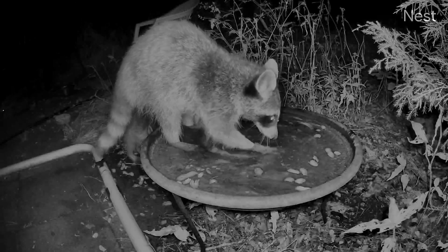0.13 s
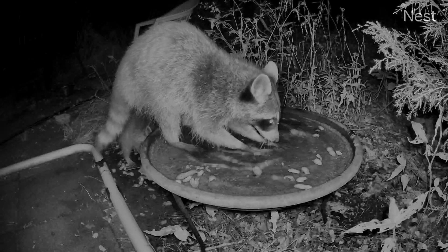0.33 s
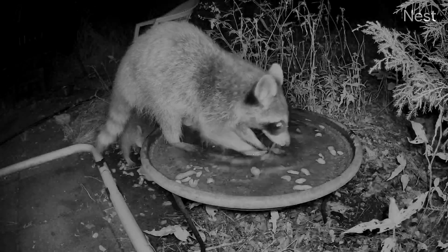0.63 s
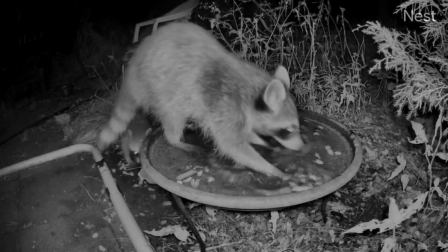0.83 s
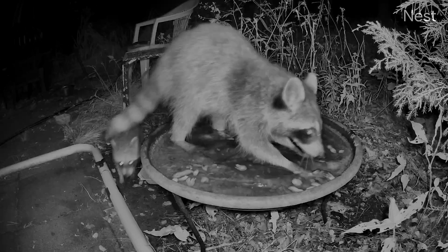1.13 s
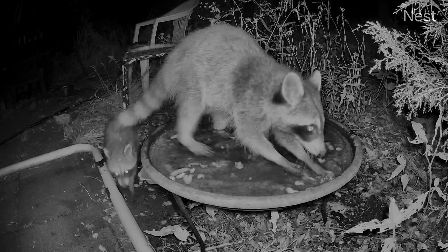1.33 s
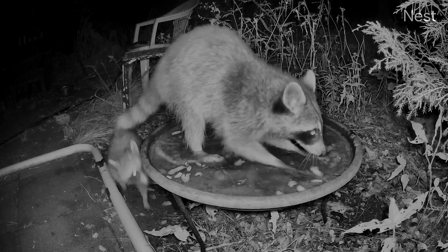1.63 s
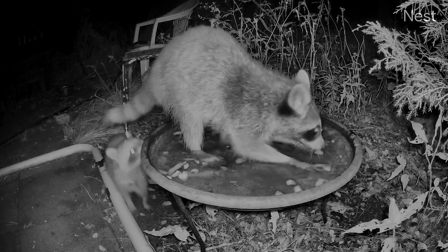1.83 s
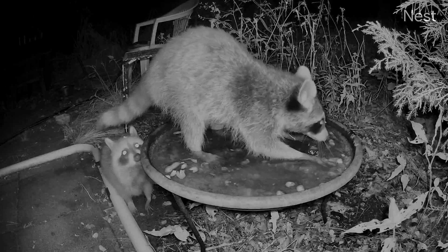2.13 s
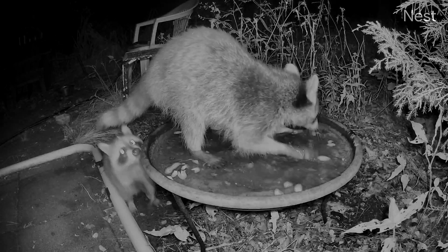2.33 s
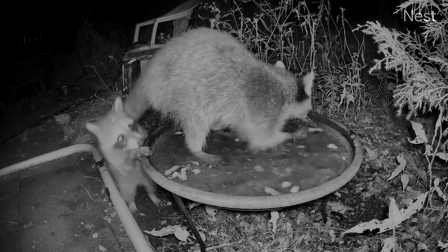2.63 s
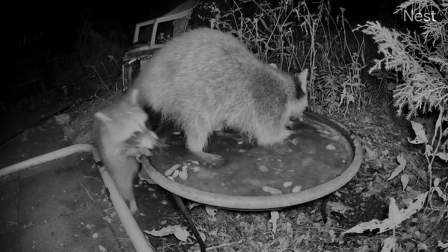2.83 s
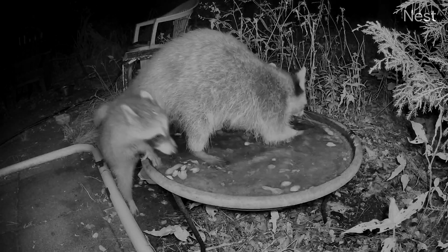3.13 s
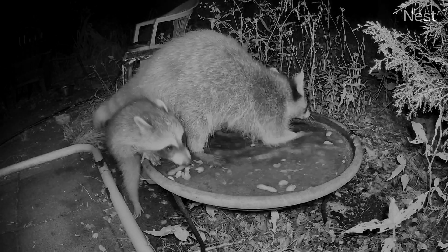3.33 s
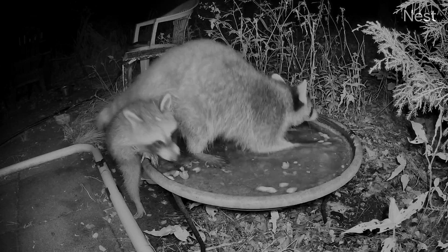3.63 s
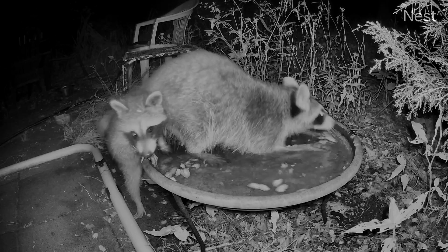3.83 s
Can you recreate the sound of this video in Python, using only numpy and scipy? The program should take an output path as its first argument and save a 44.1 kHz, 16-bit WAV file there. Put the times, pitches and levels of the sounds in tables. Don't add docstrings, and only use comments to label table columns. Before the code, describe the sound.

A young raccoon gives three short chittering trills over water plinks and quiet night insects.

```python
import sys
import numpy as np
from scipy import signal
from scipy.fft import rfft, irfft
from scipy.io import wavfile
from scipy.ndimage import uniform_filter1d

SR = 44100
rng = np.random.default_rng(int(sys.argv[2]) if len(sys.argv) > 2 else 0)


def dump(signal):
    limited = np.clip(np.atleast_2d(signal).T, -1, 1)
    pcm = np.round(limited * 32767).astype(np.int16)
    wavfile.write(sys.argv[1], SR, pcm)


def linear_from_db(decibels):
    return 10 ** (np.asarray(decibels, float) / 20)


N = 176400


def at_hz(points, hz):
    p = np.array(points)
    return np.interp(np.log(hz + 1), np.log(p[:, 0]), p[:, 1], left=-70, right=-70)


def rms_one(x):
    return x / np.sqrt(np.mean(x ** 2) + 1e-20)


def drift(rate_hz):
    r = np.exp(-80 * np.pi * rate_hz / SR)
    slow = signal.lfilter([1], [1, -2 * r, r * r], rng.standard_normal(N // 40 + 2002))[2000:]
    return np.interp(np.arange(N) / 40, np.arange(len(slow)), rms_one(slow))


def coloured(points):
    weight = linear_from_db(at_hz(points, np.fft.rfftfreq(N, 1 / SR)))
    return rms_one(irfft(rfft(rng.standard_normal(N)) * weight, N))


def band(hz, width_hz):
    edges = [hz - width_hz / 2, hz + width_hz / 2]
    sos = signal.butter(2, edges, "band", fs=SR, output="sos")
    return rms_one(signal.sosfilt(sos, rng.standard_normal(N)))


WOBBLE_SHARE = .016

# peak_s, level_db, pitch_hz, swell_s, fade_s
TRILL_PULSES = [
    [(1.783, -49, 767, 0.0044, 0.0031), (1.988, -46, 880, 0.0041, 0.0058)],
    [(2.031, -39.5, 1098, 0.0041, 0.0042)],
    [(2.0715, -34, 968, 0.0047, 0.0047), (2.108, -31, 1013, 0.0029, 0.0039)],
    [(2.1453, -31.5, 1070, 0.0048, 0.0031), (2.6519, -28, 1022, 0.005, .0053)],
    [(2.187, -32, 1007, .0045, 0.0035), (2.6871, -26.5, 1003, .0053, 0.004)],
    [(2.228, -31, 1008, 0.0038, 0.0047), (2.2678, -30.5, 1031, 0.0031, 0.0051)],
    [(2.3132, -28, 966, 0.0062, 0.0031), (2.6167, -28.5, 914, 0.0039, 0.0037)],
    [(3.7671, -39, 678, 0.0024, 0.0026), (3.799, -34, 826, 0.0016, 0.0043),
     (3.8059, -33.5, 786, 0.002, 0.0026)],
    [(3.8378, -29.5, 919, 0.0039, 0.004)],
    [(3.8736, -31, 1007, 0.0047, 0.0043)],
    [(3.9129, -30.5, 934, 0.0043, 0.0033), (3.953, -30.5, 896, 0.0054, 0.0043),
     (3.995, -30.5, 907, 0.0043, 0.0028)],
]
MOUTH_OVERTONES = [(-19, -28, -30, -27, -42), (-1.5, -26, -30, -36, -30), (-12, -34.5, -23.5, -31.5, -29.5),
                   (-12, -25, -25.5, -36, -36), (-13.5, -19.5, -26.5, -27, -36),
                   (-12, -13, -24.5, -32, -33.5), (-17.5, -32.5, -36.5, -43, -39),
                   (-28.5, -29.5, -18, -26, -37), (-6.5, -28.5, -19.5, -25, -39),
                   (-2.5, -16, -11, -23, -35), (-6.5, -19.5, -8.5, -15, -35)]
BREATH_HAZE = [-43, -38, -38, -37, -37, -39, -43, -38, -33, -33, -33]


def trill(pulses, overtones_db, haze_db, breath):
    swell_power, fade_power = 2.0, 2.76
    shut_share, close_s = 0.98, 0.00049
    rise_share, sag_share, sag_s = .12, 0.21, 0.0015
    late_share, late_power, linger_s = 0.61, 1.98, .0028
    tail_db, tail_s, tail_share = -12, .004, .71
    haze_s, rasp_db, leak_db = .03, -38, -22
    rasp, wobble = breath
    out = np.zeros(N)
    for (peak, db, hz, rise, fade), luck in zip(pulses, rng.standard_normal((len(pulses), 8))):
        on = np.arange(int((peak - .045) * SR), min(int((peak + .03) * SR), N))
        u = on / SR - peak
        length = rise + fade
        v = u - late_share * fade
        after = np.maximum(v, 0)
        shut = 1 / (1 + np.exp(np.clip((u - shut_share * fade) / close_s, -50, 50)))
        opening = (np.maximum(-u, 0) / rise) ** swell_power
        closing = (np.maximum(u, 0) / fade) ** fade_power
        swell = .5 ** (opening + closing)

        climb = rise_share * np.tanh(u / length)
        sag = sag_share * (.5 + .5 * np.tanh((u - fade) / sag_s))
        pitch = hz * (1 + climb - sag + WOBBLE_SHARE * wobble[on])
        phase = 2 * np.pi * np.cumsum(pitch) / SR + luck[6]

        late = np.exp(-(np.minimum(v, 0) / length * late_power) ** 2 - (after / linger_s) ** 2)
        overtones = sum(linear_from_db(d + 2.6 * luck[k]) * np.sin((k + 2) * phase - np.pi / 2 + k * k)
                        for k, d in enumerate(overtones_db))
        haze = linear_from_db(haze_db) * np.clip(1 - np.abs(u) / haze_s, 0, 1) * rasp[on]
        hum = linear_from_db(leak_db) * shut * np.clip((u + 0.019) / 0.015, 0, 1)
        flutter = linear_from_db(tail_db + 2.0 * luck[7]) * (1 - shut) * np.exp(-after / tail_s)
        flutter = flutter * np.sin(2 * np.pi * tail_share * hz * u)
        bright = late * (overtones + linear_from_db(rasp_db) * rasp[on])
        out[on] += linear_from_db(db) * ((swell + hum) * np.sin(phase) + flutter + haze + bright)
    return out


# time_s, pitch_hz, level_db, second_partial_db
HELD_NOTES = [
    [(2.344, 870, -60, -90), (2.35, 862, -34, -70), (2.355, 860, -35.5, -59), (2.362, 878, -33, -55),
     (2.367, 900, -34, -62), (2.372, 960, -28.5, -46), (2.375, 978, -31, -43), (2.379, 950, -55, -62)],
    [(2.404, 850, -62, -90), (2.41, 810, -36.5, -74), (2.414, 750, -41, -79), (2.419, 725, -40, -85),
     (2.432, 715, -55, -88), (2.445, 700, -70, -98)],
    [(2.723, 860, -62, -80), (2.728, 860, -35, -54), (2.738, 835, -43, -49), (2.752, 832, -37, -51),
     (2.757, 775, -39, -56), (2.762, 745, -33.5, -66), (2.77, 715, -41, -68), (2.785, 715, -60, -86)],
]
HELD_PARTIALS = [(-17, -6, -30), (-8, -8, -12), (-6, -27, -23)]


def held_notes(wobble):
    out, t = np.zeros(N), np.arange(N) / SR
    for rows, partials_db in zip(HELD_NOTES, HELD_PARTIALS):
        s, hz, first_db, second_db = np.transpose(rows)
        phase = 2 * np.pi * np.cumsum(np.interp(t, s, hz) * (1 + WOBBLE_SHARE * wobble)) / SR
        levels = []
        for db in (first_db, second_db):
            course = uniform_filter1d(np.interp(t, s, db, left=-120, right=-120), size=60)
            levels.append(np.sqrt(2) * linear_from_db(course))
        one, two = levels
        upper = sum(linear_from_db(d) * np.sin((k + 3) * phase) for k, d in enumerate(partials_db))
        out += one * np.sin(phase) + two * (np.sin(2 * phase) + two / two.max() * upper)
    return out


# time_s, level_db, half_length_s, low_hz, high_hz
BREATH_PUFFS = [
    (1.983, -67.5, 0.01, 1200, 4200),
    (2.653, -62, .004, 5500, 9800),
    (2.686, -47, 0.002, 2000, 6200),
    (2.69, -68, 0.0071, 5000, 9750),
    (2.707, -63, 0.011, 1500, 6500),
    (2.735, -62, .005, 3500, 9800),
    (2.758, -56, 0.014, 2500, 3250),
    (2.775, -66, 0.0047, 1200, 7000),
    (3.815, -76, 0.0066, 2700, 3700),
]


def puffs():
    t = np.arange(N) / SR
    out = np.zeros(N)
    for s, db, half, low, high in BREATH_PUFFS:
        out += linear_from_db(db) * np.exp(-((t - s) / half) ** 2) * band((low + high) / 2, high - low)
    return out


# start_s, level_db, pitch_hz, t60_s, splash_db
WATER_DROPS = [(0.6997, -33.5, 2184, 0.064, -66.5), (0.833, -48, 7900, 0.02, -79),
               (0.869, -51.5, 1780, 0.021, -59), (1.215, -63.5, 2005, 0.12, -57.5),
               (1.241, -33, 4104, 0.018, -53), (1.242, -48, 4800, 0.016, -77),
               (1.382, -50.5, 3630, 0.038, -53), (1.381, -56.5, 1880, 0.044, -73),
               (1.429, -40, 7850, 0.019, -65), (1.47, -49.5, 5580, 0.026, -52),
               (1.529, -45.5, 4200, 0.018, -51), (1.779, -57, 4200, .03, -72),
               (1.777, -56, 3450, 0.028, -65), (1.818, -57, 4560, 0.033, -75),
               (2.965, -53.5, 3260, 0.049, -76)]


def water_drops():
    attack_s, burst_s, splash_t60_s = .0035, .02, .02
    out, t = np.zeros(N + SR), np.arange(SR // 4) / SR
    attack = np.sin(np.pi / 2 * np.minimum(t / attack_s, 1)) ** 2
    burst = .08 + .92 / (1 + np.exp(np.minimum((t - burst_s) / .001, 50)))
    for s, db, hz, t60, splash_db in WATER_DROPS:
        partner = 0.4 * np.exp(-t / 0.0077) * np.sin(2 * np.pi * 1.07 * hz * t)
        ring = attack * burst * linear_from_db(db - 60 * t / t60) * (np.sin(2 * np.pi * hz * t) + partner)
        splash = linear_from_db(splash_db - 60 * t / splash_t60_s) * np.diff(rng.standard_normal(len(t) + 1))
        out[int(s * SR):][:len(t)] += ring + splash
    return out[:N]


# start_s, level_db, pitch_hz, t60_s
FOOTFALLS = [
    (1.452, -50, 68, .12),
    (2.6, -58, 60, .2),
    (3.39, -57, 65, .15),
    (2.85, -58, 60, .15),
    (1.7, -57, 62, .2),
]


def footfalls():
    out, t = np.zeros(N + SR), np.arange(SR // 4) / SR
    for s, db, hz, t60 in FOOTFALLS:
        envelope = (1 - np.exp(-t / 0.01)) * linear_from_db(db - 60 * t / t60 + 8.0)
        out[int(s * SR):][:len(t)] += envelope * np.sin(2 * np.pi * hz * t)
    return out[:N]


def yard(x):
    level_db, t60_s, gap_s = -21.5, 0.22, 0.0025
    tilt, leaf_stir = .6, 1.2
    t = np.arange(SR // 5) / SR
    echo = rng.standard_normal(len(t)) * linear_from_db(-60 * t / t60_s) * np.clip(t / gap_s - 1, 0, 1)
    stirred = x * rms_one(1 + leaf_stir * drift(110))
    bright = signal.lfilter([5, -5 * tilt], [1], stirred)
    return linear_from_db(level_db) * signal.fftconvolve(bright, echo / np.sqrt(np.sum(echo ** 2)))[:N]


# pitch_hz, level_db, t60_s
WING_MODES = [(5950, -62, .012), (6390, -63, .012), (9600, -72, .004)]


def katydid():
    strokes_per_s, first_stroke_s, stops_s, teeth_s = 86, .002, .42, 0.0057
    t = np.arange(N) / SR
    since_stroke = ((t - first_stroke_s) * strokes_per_s % 1) / strokes_per_s
    scratching = (since_stroke < teeth_s) * (t < stops_s)
    teeth = scratching * linear_from_db(0.65 * drift(23)) * rng.standard_normal(N) + 1e-18
    out = 0
    for hz, db, t60 in WING_MODES:
        r = linear_from_db(-60 / (t60 * SR))
        poles = [1, -2 * r * np.cos(2 * np.pi * hz / SR), r * r]
        rung = signal.lfilter([1], poles, signal.lfilter([1], poles, teeth))
        out = out + linear_from_db(db - 14) * rms_one(rung)
    return out


# start_s, end_s, level_db
RASP_BURSTS = [
    (0.605, 0.89, -77),
    (1.52, 1.826, -73),
    (2.87, 3.28, -73.5),
    (1.4, 1.29, -71),
]
# pitch_hz, width_hz, level_db
RASP_BANDS = [(4520, 550, 0), (5000, 340, -4), (3260, 200, -5), (2200, 150, -10.5)]


def rasping_insect():
    throb_db, throbs_per_s, grain_db, fade_s = 3.0, 12.03, 3.0, .07
    t = np.arange(N) / SR
    gate = np.zeros(N)
    for a, b, db in RASP_BURSTS:
        throb = throb_db * np.sin(2 * np.pi * throbs_per_s * (t - a))
        gate += linear_from_db(db + throb) * np.clip(np.minimum(t - a, b - t) / fade_s, 0, 1)
    grains = sum(linear_from_db(db + grain_db * drift(29)) * band(hz, width) for hz, width, db in RASP_BANDS)
    return gate * grains


# pitch_hz, width_hz, level_db
CHORUS_BANDS = [(2830, 290, -75.5), (6020, 470, -73), (6390, 740, -76), (9140, 790, -80.5), (3650, 61, -90)]


def far_chorus():
    out = np.zeros(N)
    for hz, width, db in CHORUS_BANDS:
        out += linear_from_db(db + 1.3 * (drift(3.7) + drift(23))) * band(hz, width)
    return out


# pitch_hz, level_db
TRAFFIC_SPECTRUM = [(12, -50), (20, -27), (42, -5), (70, -4), (107, -0.5), (188, -5.5), (536, -18.5),
                    (586, -17.5), (1500, -28), (1950, -82), (3300, -120)]
# pitch_hz, level_db (per Hz)
AIR_SPECTRUM = [(1000, -15.5), (1700, 6), (3800, 5), (5200, 1), (7000, 10), (8200, 6.5), (9700, 2.5),
                (10400, -16)]


def traffic_and_air():
    rumble = linear_from_db(-65 + 1.0 * drift(0.8)) * coloured(TRAFFIC_SPECTRUM)
    return rumble + linear_from_db(-74 + 1 * drift(11.0)) * coloured(AIR_SPECTRUM)


def scene():
    breath = band(3300, 3300), band(340, 550)
    voice = held_notes(breath[1]) + puffs()
    for pulses, overtones_db, haze_db in zip(TRILL_PULSES, MOUTH_OVERTONES, BREATH_HAZE):
        voice = voice + trill(pulses, overtones_db, haze_db, breath)
    throat = signal.butter(4, 500, "high", fs=SR, output="sos")
    near = signal.sosfiltfilt(throat, voice)
    taps = water_drops() + footfalls()
    background = katydid() + rasping_insect() + far_chorus() + traffic_and_air()
    return (near + taps + yard(near + .5 * taps) + background)[None]


def top_cut(x):
    return signal.sosfilt(signal.butter(12, 10100, fs=SR, output="sos"), x)


def record(dry):
    hz = np.fft.rfftfreq(N, 1 / SR)
    shelf_db = -17 / (1 + np.exp(-(hz - 7300) / 130))
    end_db = -40 / (1 + np.exp(-(hz - 10150) / 100))
    heard = irfft(rfft(dry) * linear_from_db(shelf_db + end_db), N)
    mix = heard + linear_from_db(-93) * rng.standard_normal(dry.shape)
    return top_cut(mix)


dry = scene()
out = record(dry)
dump(out)
```